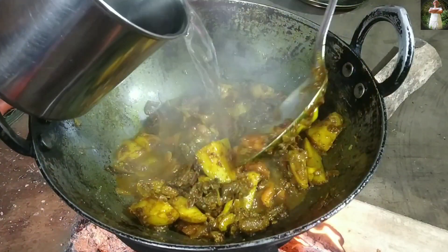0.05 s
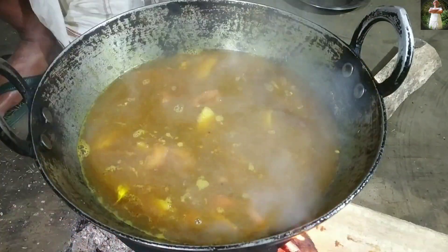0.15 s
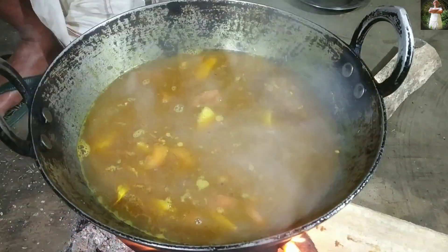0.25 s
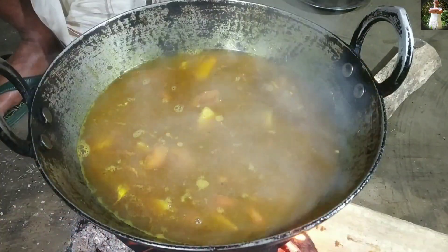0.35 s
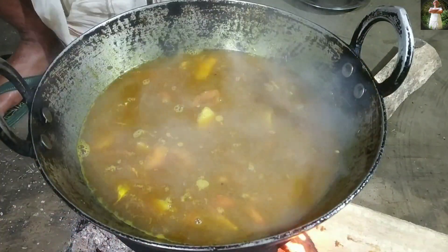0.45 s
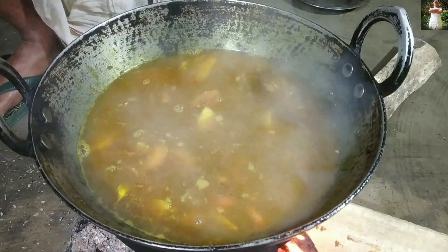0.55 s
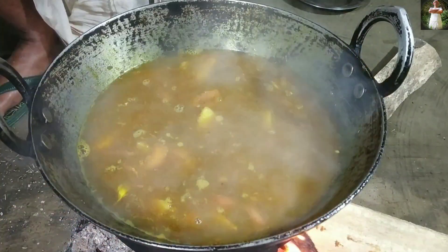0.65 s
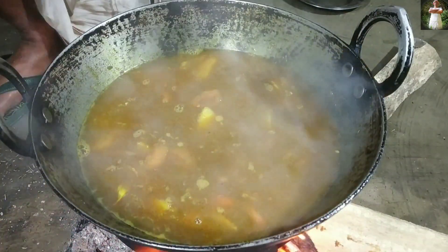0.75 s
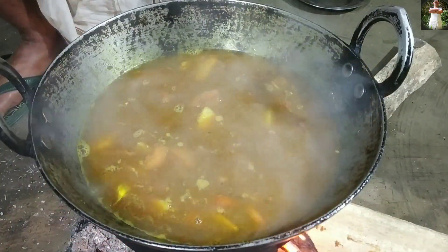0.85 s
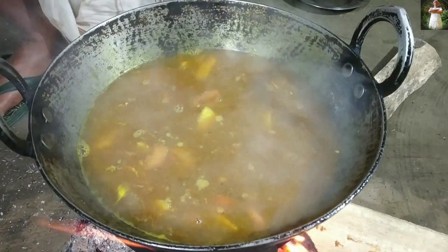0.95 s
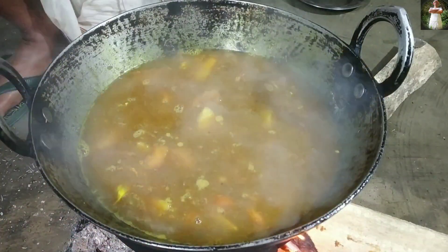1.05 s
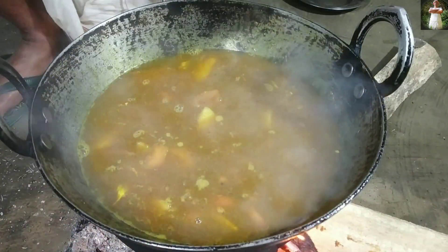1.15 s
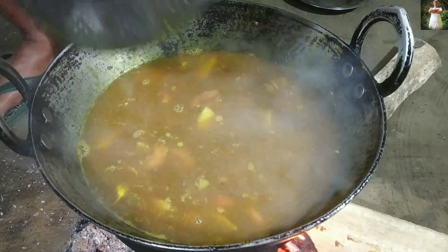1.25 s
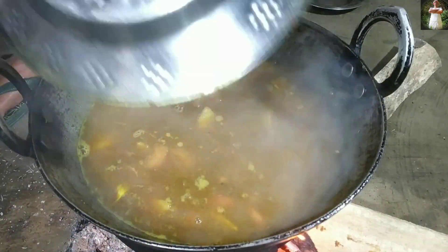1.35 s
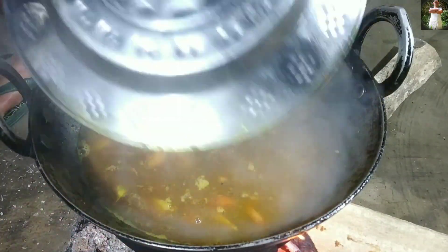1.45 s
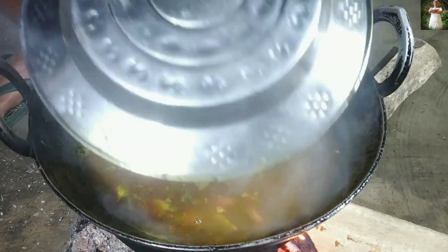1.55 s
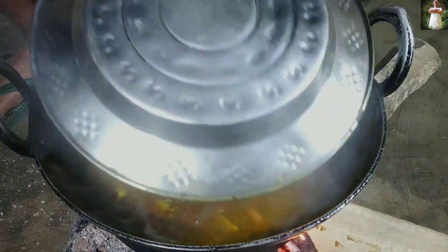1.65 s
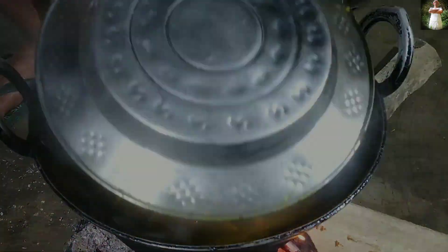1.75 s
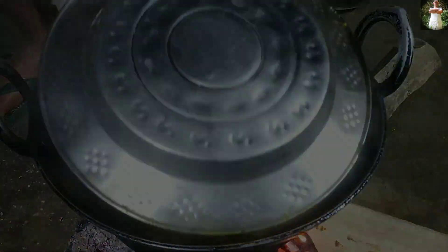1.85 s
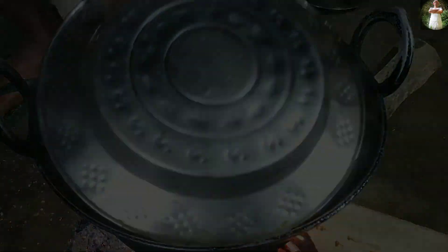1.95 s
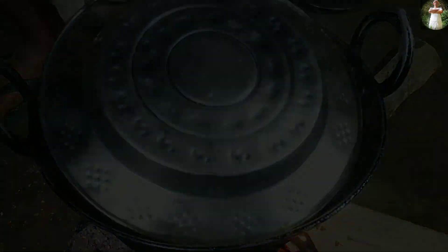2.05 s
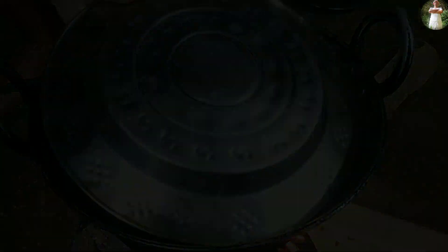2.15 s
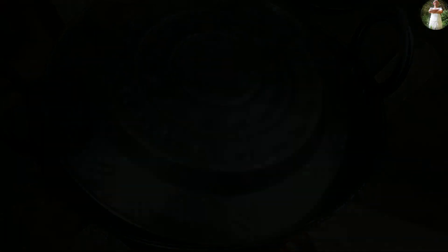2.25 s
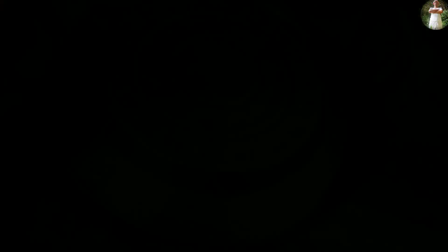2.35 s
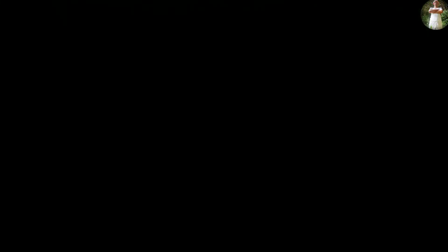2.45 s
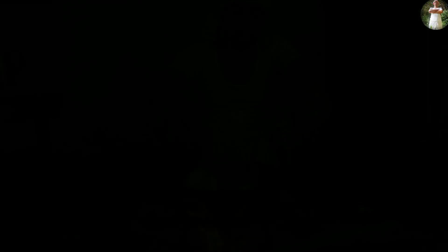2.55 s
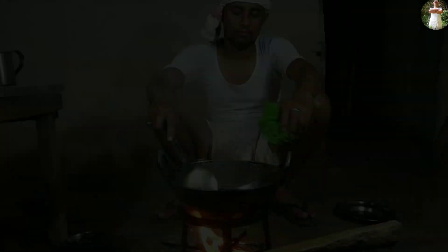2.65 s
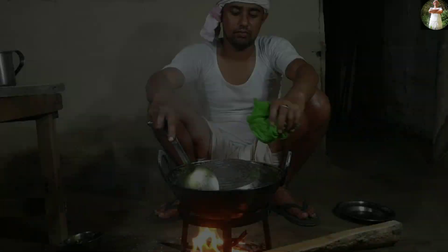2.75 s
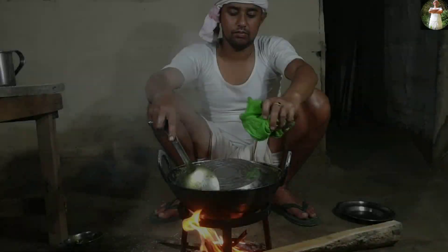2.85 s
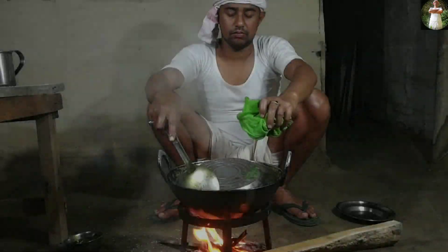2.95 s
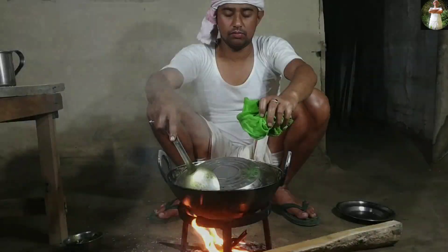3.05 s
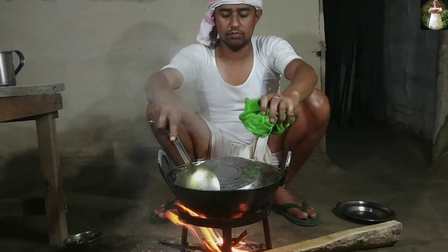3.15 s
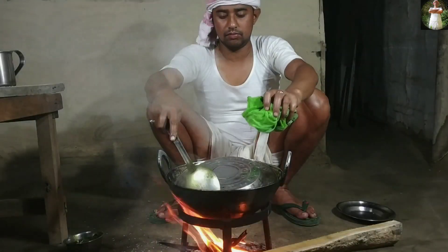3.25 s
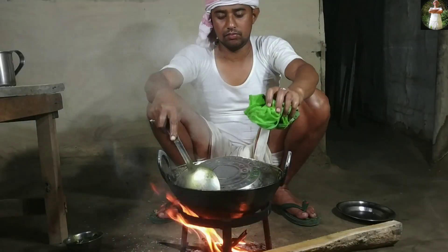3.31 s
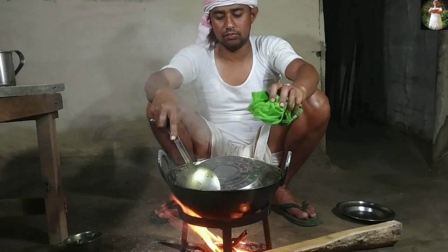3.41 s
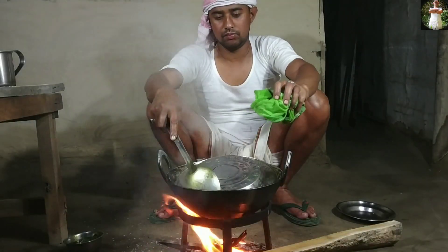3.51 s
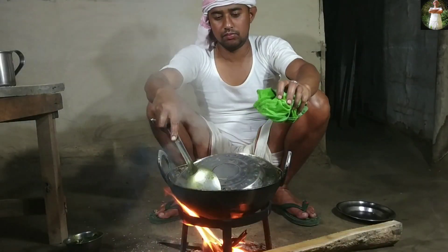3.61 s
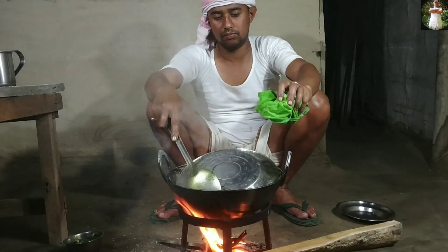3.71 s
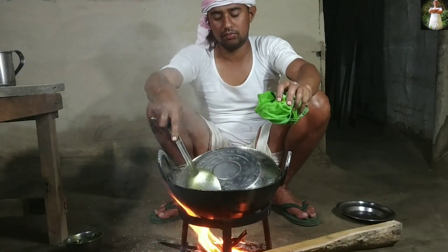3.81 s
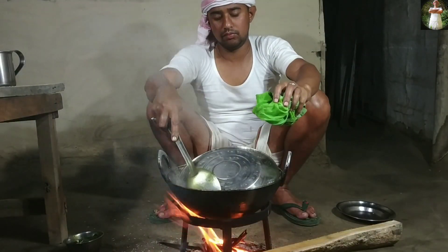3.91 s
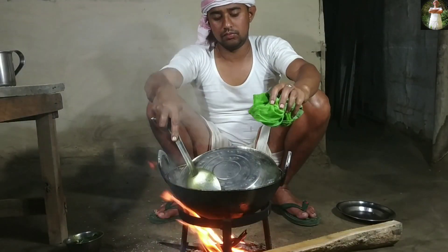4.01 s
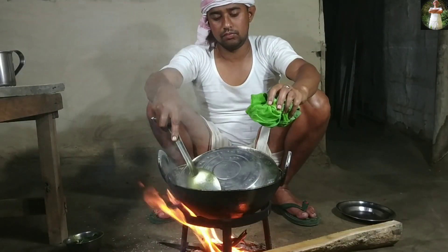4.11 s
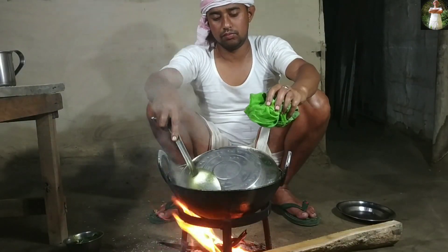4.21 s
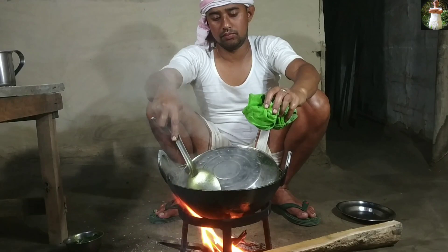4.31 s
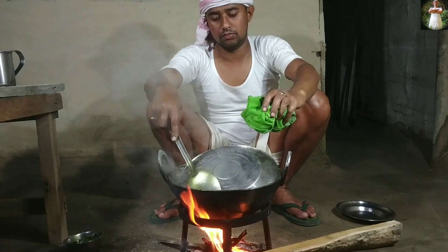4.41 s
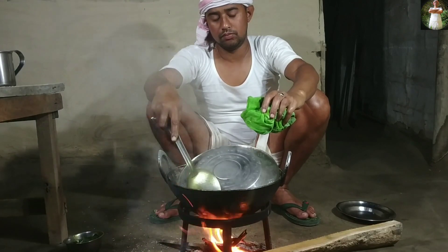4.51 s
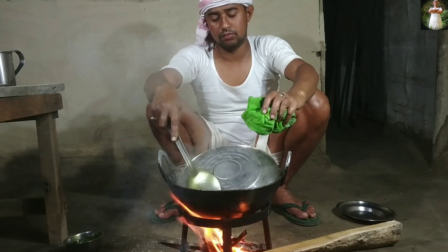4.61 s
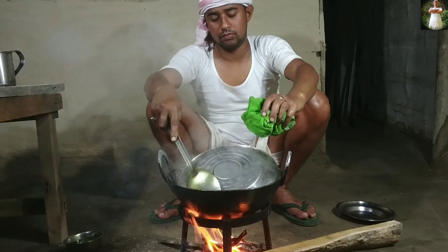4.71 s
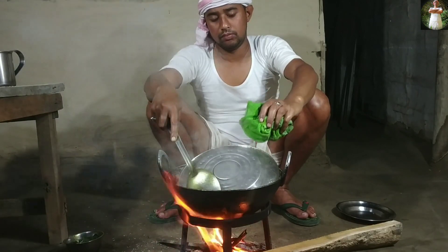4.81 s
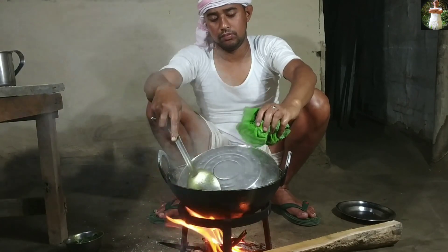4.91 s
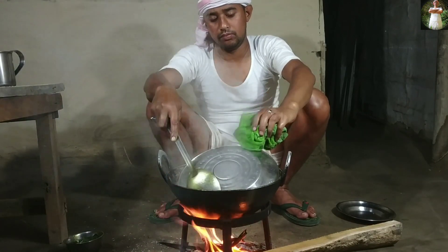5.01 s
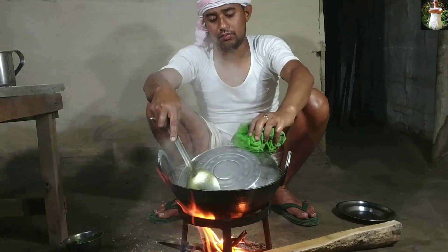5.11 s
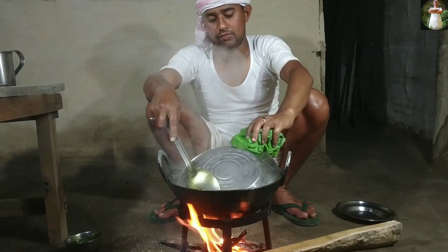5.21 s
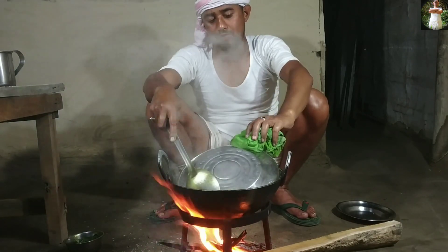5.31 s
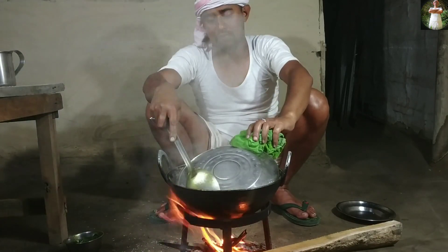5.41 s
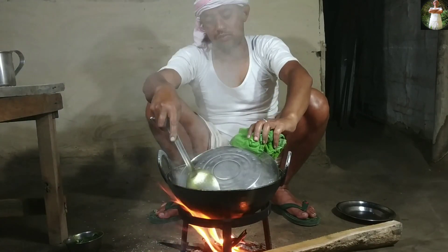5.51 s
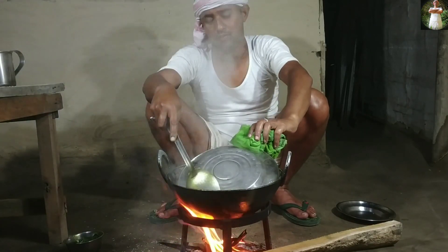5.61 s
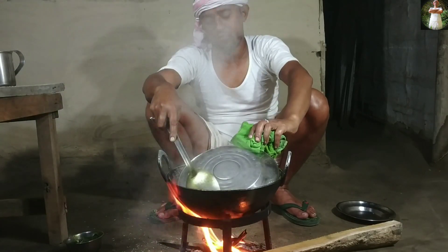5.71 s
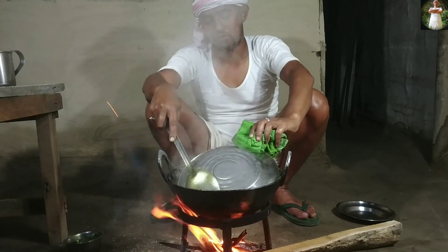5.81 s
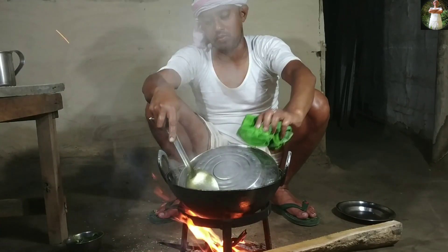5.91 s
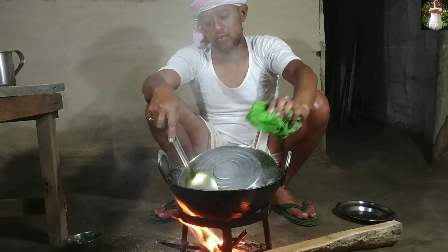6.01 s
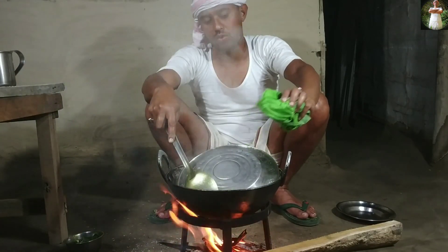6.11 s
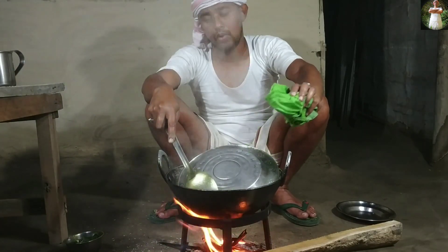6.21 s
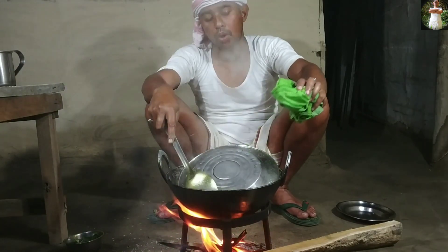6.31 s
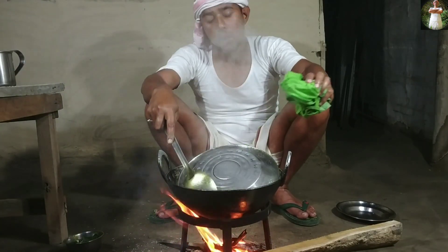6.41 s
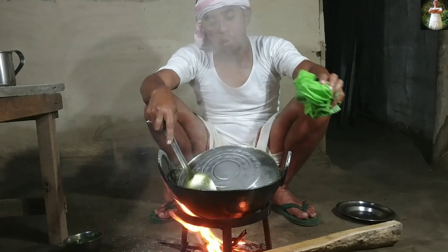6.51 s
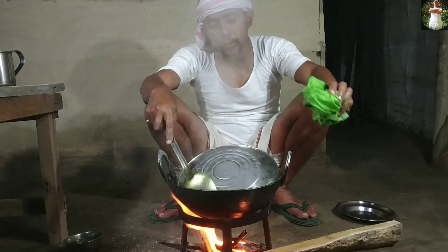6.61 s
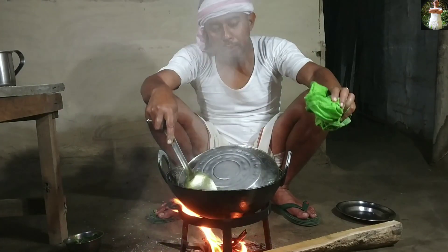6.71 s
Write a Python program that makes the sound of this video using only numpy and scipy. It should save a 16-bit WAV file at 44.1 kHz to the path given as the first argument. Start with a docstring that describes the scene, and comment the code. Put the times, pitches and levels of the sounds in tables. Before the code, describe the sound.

A loud searing hiss cuts off, metal clinks and steam spurts, a lid claps down, sound fades, then distant flames puff over gently bubbling food.

```python
"""Hot water hisses in an iron pan on a wood fire and breaks off. A ladle clanks down, the broth fizzes,
and a thin metal lid clanks on. After a fade the stove is heard from further off: a knock on the pan,
a gurgle, then flames that flutter and puff under the simmering food while the firewood ticks.
Water and fire are coloured noise, bubbles are short gliding tones, and struck metal is a set of
ringing tones with a wash of noise."""
import sys
import numpy as np
from scipy import signal
from scipy.fft import rfft, irfft, next_fast_len
from scipy.io import wavfile
from scipy.ndimage import uniform_filter1d, map_coordinates

SR = 44100
rng = np.random.default_rng(int(sys.argv[2]) if len(sys.argv) > 2 else 0)


def persist_wave(psi):
    """Save psi, clipped to +-1, as 16-bit WAV."""
    counts = np.round(np.clip(psi, -1, 1) * 32767).astype(np.int16)
    wavfile.write(sys.argv[1], SR, np.atleast_2d(counts).T)


N = 298116

# the close scene fades out and gives way to the far scene
FAR_STARTS_S = 2.572


def amp(db):
    """Turn decibels into a factor to multiply by."""
    return np.exp(np.asarray(db) * (np.log(10) / 20))


def clock():
    """The time of every sample, in seconds."""
    return np.arange(N) / SR


def unit(x):
    """Scale a signal to an average strength (rms) of 1."""
    return x / np.sqrt(np.mean(x ** 2))


def noise(size=N):
    """Two unrelated white noises: all frequencies equally strong."""
    return rng.standard_normal((2, size), dtype="f")


def colour(x, points, size=4096):
    """Filter through (Hz, dB) points; the response never starts before its input (minimum phase)."""
    hz, db = np.transpose(points)
    bin_hz = np.arange(size // 2 + 1) * SR / size
    gain_db = np.interp(np.log(bin_hz + 1), np.log(hz), db)
    # folding the cepstrum forward in time makes the filter causal
    cepstrum = irfft(np.log(amp(gain_db)))
    cepstrum[1:size // 2] *= 2
    cepstrum[size // 2 + 1:] = 0
    response = irfft(np.exp(rfft(cepstrum)))[:size // 2]
    filtered = signal.oaconvolve(np.atleast_2d(x).astype("f"), response[None].astype("f"), axes=1)
    return filtered[:, :x.shape[-1]]


def stereo(pair, points):
    """Two signals become the middle and the left-right difference of one coloured sound, rms 1."""
    # the bass is nearly alike in both ears: (frequency [Hz], gain of the difference signal [dB])
    side_gain = [(40, -5.5), (130, -16.5), (250, -13.5), (500, -8), (1000, -4), (2200, -0.5), (16000, 0)]
    side = colour(pair[1], side_gain)
    left_right = np.vstack([pair[0] + side, pair[0] - side])
    return unit(colour(left_right, points))


def crackle(spread_db, smooth_db, count=12000):
    """Tiny bursts of unequal size over steady noise, smooth_db stronger than the bursts; rms 1."""
    bursts = np.zeros((2, N), dtype="f")
    sizes = amp(spread_db * np.minimum(rng.exponential(size=count), 4))
    bursts[:, rng.integers(0, N, count)] = sizes * noise(size=count)
    return unit(unit(bursts) + float(amp(smooth_db)) * noise())


def ragged(x, depth_db, spacing_hz=30, full_hz=4000):
    """Raise some frequencies and sink others at random, like crowded resonances; less so in the bass."""
    size = next_fast_len(x.shape[-1], True)
    hz = np.arange(size // 2 + 1) * SR / size
    heights = np.minimum(rng.standard_normal(size=1200), 1.5)
    unevenness = np.interp(hz / spacing_hz, np.arange(len(heights)), heights)
    db = depth_db * np.minimum(hz / full_hz, 1) * unevenness
    return irfft(rfft(x, size) * amp(db), size)[:, :x.shape[-1]]


def drift(x, rate, depth):
    """Let the pitch wander by a share depth, with rate changes a second, by uneven playback speed."""
    place = np.cumsum(1 + depth * walk(rate)[:x.shape[-1]])
    return np.array([map_coordinates(channel, [place], order=2, mode="mirror") for channel in x])


def walk(rate):
    """A random wandering curve with rate new targets a second and a spread near 1."""
    hold = int(SR / rate)
    steps = np.repeat(rng.standard_normal(N // hold + 1), hold)
    return unit(uniform_filter1d(steps, hold)[:N])


def swells(rows):
    """Envelope of bursts (start s, peak dB, swell time s) that rise quickly and die more slowly."""
    power = np.zeros(N)
    for s, db, swell in rows:
        start = int(s * SR)
        age = np.arange(min(SR // 2, N - start)) / SR / max(swell, 1 / SR)
        power[start:start + len(age)] += (amp(db) * age * np.exp(1 - age)) ** 2
    return np.sqrt(power)


def held(start_s, end_s, rise, fall):
    """Envelope in dB: a rise until start_s and a fall after end_s, in dB per s; they add if they overlap."""
    t = clock()
    before = abs(rise) * np.maximum(start_s - t, 0)
    after = abs(fall) * np.maximum(t - end_s, 0)
    return np.maximum(-before - after, -200)


def hump(s, width_s):
    """A smooth bell-shaped swell of height 1 around one moment."""
    return np.exp(-np.minimum(((clock() - s) / width_s) ** 2, 100) / 2)


def by_scene(close, far):
    """One value while close, the other from further off."""
    return np.where(clock() < FAR_STARTS_S, close, far)


def stove_db(surges):
    """Stove level change in dB: screened as the lid nears, swelling in from afar, lifted by surges."""
    lid_nears_s, lid_screen_db_per_s, swell_in_s = 1.615, 17.5, 0.29
    t = clock()
    screened = -lid_screen_db_per_s * np.maximum(t - lid_nears_s, 0)
    swelled = 1 - np.exp(-np.maximum(t - FAR_STARTS_S, 0) / swell_in_s)
    swelling = 20 * np.log10(swelled ** 2 + 1e-8)
    lifted = sum(db * hump(s, width) for s, db, width in surges)
    return by_scene(screened, swelling) + lifted


def sear():
    """Water flashes to steam on hot iron: so many bursts that they merge into a hiss, then break off."""
    # tone of water on hot iron: (frequency [Hz], relative level [dB])
    sear_tone = [(70, -38), (100, -21.5), (659, -8.5), (868, -11.5), (2450, -9), (2670, -15), (3090, -6.5),
                 (3370, -11.5), (5960, -2), (8730, -14), (12500, -9.5), (15800, -11)]
    bursts = crackle(spread_db=1.2, smooth_db=3, count=80000)
    hiss = stereo(ragged(bursts, depth_db=4.0), sear_tone)
    return hiss * amp(-27.5 + held(start_s=0, end_s=.057, rise=0, fall=1358.5))


def flames():
    """The fire makes a low roar with a ragged flutter above it; both grow as it flares up."""
    # tones of the roar and the flutter: (frequency [Hz], relative level [dB])
    rumble_tone = [(25, -47.5), (70, -51), (125, -27.5), (165, -7.5), (195, -7.5), (213, 1), (226, -5.5),
                   (242, 1.5), (275, -6.5), (340, -11), (500, -17.5), (1000, -32.5)]
    flutter_tone = [(150, -40), (350, -8), (470, 9), (560, 1.5), (660, -5), (780, 2.5), (940, -9),
                    (1060, -0.5), (1400, -8.5), (1900, -18), (3200, -24.5), (8000, -36)]
    # the fire flares up: (middle [s], rumble gain [dB], bell width [s])
    flares = [(3.78, 3.5, 0.31), (5.46, 2.5, 0.055), (6.38, 2.5, 0.23)]
    flutter_growth = 1.84  # dB of flutter for each dB of rumble
    fire_db = stove_db(flares)
    rumble_db = by_scene(close=-57, far=-54) + fire_db + 1.6 * walk(25)
    rumble = stereo(noise(), rumble_tone) * amp(rumble_db)
    flutter = stereo(crackle(spread_db=0.5, smooth_db=3.5, count=4000), flutter_tone)
    flutter_db = by_scene(close=-65, far=-56) + flutter_growth * fire_db + 1.9 * walk(40)
    return rumble + flutter * amp(flutter_db)


def fizz():
    """Tiny bubbles burst along the hot wall of the pan, faster than the ear can count."""
    # tone of the bursting bubbles: (frequency [Hz], relative level [dB])
    fizz_tone = [(300, -11.5), (1500, 8.5), (3000, 4), (5000, 0.5), (9000, 0), (12000, 0.5), (15000, 2)]
    # the liquid wets more hot iron and fizzes harder: (middle [s], gain [dB], bell width [s])
    surges = [(1.35, 3.2, 0.19), (3.7, 4.3, 0.46)]
    bursting = ragged(crackle(spread_db=2.5, smooth_db=3.5, count=20000), depth_db=3.5)
    return stereo(bursting, fizz_tone) * amp(-56.5 + stove_db(surges) + 1.4 * walk(30))


def struck(blows, modes, wash, wash_db, wash_t60, ragged_db, crack_db, lag_ms, low_hz, build_s, crack_s):
    """Every contact cracks and leaves a wash of overtones; the main tones start at the first and ring on."""
    t = np.arange(SR * 3 // 4) / SR
    # t60 is the time in which a sound dies away by 60 dB
    overtones = stereo(ragged(noise(size=len(t)), ragged_db), wash)
    clash = amp(wash_db) * overtones * np.exp(-np.log(1000) * t / wash_t60)
    clash = clash + amp(crack_db) * stereo(noise(size=len(t)), wash) * np.exp(-t / crack_s)
    out = np.zeros((2, N))
    for s, db, tilt in blows:
        start = int(s * SR)
        slope = [(375, -2 * tilt), (12000, 3 * tilt)]  # five octaves apart
        out[:, start:start + len(t)] += amp(db) * colour(clash, slope)
    # the ringing reaches the right ear a little later
    ears = np.maximum(t - np.array([[0], [lag_ms * 1e-3]]), 0)
    ring = np.zeros((2, len(t)))
    for hz, db, t60 in modes:
        ring += amp(db) * np.cos(2 * np.pi * hz * ears) * np.exp(-np.log(1000) * ears / t60)
    first = int(blows[0][0] * SR)
    out[:, first:first + len(t)] += ring * (1 - np.exp(-ears / build_s))
    # a small object radiates little bass
    return signal.sosfilt(signal.butter(3, low_hz, "high", fs=SR, output="sos"), out)


def ladle():
    """The ladle is put down: quick metal contacts make it ring with many crowded overtones."""
    # contacts: (time [s], clash level [dB], hardness as brightness tilt [dB per octave])
    blows = [(.1893, -27.5, -1.5), (.1978, -36, 0), (.1993, -38.5, 6.5), (.2055, -40.5, 4),
             (.2185, -31, -9), (.255, -46, 0.5)]
    # ringing tones: (frequency [Hz], level before build-up and bass cut [dB], t60 [s])
    modes = [(762, -32, .24), (873, -32, .26), (937, -30, .24), (1005, -28, .3), (1099.6, -21, .22),
             (1145, -28, .2), (2297, -42, .24), (3522, -39, .19), (3639, -37.5, .2), (6648, -47, .34),
             (8452, -42, .16), (9639, -40, .22), (10276, -41, .22), (10679, -37.5, .22)]
    # wash of dense overtones: (frequency [Hz], relative level [dB])
    wash = [(200, 0.5), (500, -19.5), (780, 2), (1080, 6.5), (1450, -4.5), (2400, -0.5), (3700, -0.5),
            (4650, -2), (5000, -20), (5800, -12), (6300, -22), (7600, -13), (8300, -12), (10700, -4.5),
            (11700, -19), (12500, -14), (15500, -17)]
    return struck(blows, modes, wash, wash_db=-1, wash_t60=0.24, ragged_db=5, crack_db=4,
                  lag_ms=0.3, low_hz=480, build_s=0.00066, crack_s=0.0055)


def thuds():
    """Soft thuds: noise centred on the low tones, in short swells."""
    # tone: (frequency [Hz], relative level [dB])
    thud_tone = [(30, -19), (70, -21.5), (120, -17.5), (170, 0), (250, 10.5), (380, -7), (700, -8),
                 (3000, -46)]
    # thuds: (start [s], peak level [dB], swell time [s])
    thud_times = [(.19, -46, 0.0084), (.28, -55, 0.011), (.548, -48, 0.0035), (.86, -51, 0.021),
                  (1.44, -49, 0.0084), (3.045, -49, .003), (3.582, -44.5, 0.021)]
    return stereo(noise(), thud_tone) * swells(thud_times)


def ticks():
    """The firewood ticks: dry snaps of noise that die at once, each with a faint, longer tail."""
    # tone: (frequency [Hz], relative level [dB])
    tick_tone = [(200, 1), (1000, 0), (3000, 1), (7000, 3), (12000, 3.5), (16000, 4)]
    # ticks: (time [s], level before the shared trim [dB])
    tick_times = [(.33, -37), (.598, -44), (.6721, -41), (.7823, -43), (1.274, -38), (1.586, -45),
                  (2.129, -44), (2.1408, -34.5), (2.2833, -48), (3.583, -33), (3.6057, -35.5), (4.749, -43),
                  (5.222, -41), (5.48, -34), (5.523, -36.5), (6.073, -44), (6.613, -42)]
    trim_db, tail_db, snap_s, tail_s = -4, -19, 0.002, 0.042
    snaps = np.zeros(N)
    age = clock()[:SR // 10]
    snap = np.exp(-age / snap_s) + amp(tail_db) * np.exp(-age / tail_s)
    for s, db in tick_times:
        start = int(s * SR)
        snaps[start:start + len(age)] += amp(db + trim_db) * snap[:N - start]
    return stereo(noise(), tick_tone) * snaps


def whistles():
    """Thin whistles of steam: narrow bands of noise whose pitch wavers."""
    # whistles: (middle [s], bell width [s], centre frequency [Hz], peak level [dB])
    whistle_rows = [(.42, 0.038, 3130, -61), (.5, 0.028, 3200, -58.5), (0.687, 0.065, 2140, -55),
                    (1.2, .18, 1566, -63.5)]
    out = np.zeros((2, N))
    for s, width, hz, db in whistle_rows:
        band = [(hz * .8, -35), (hz * .93, 0), (hz * 1.07, 0), (hz * 1.25, -35)]
        whistle = drift(unit(colour(noise(size=2 * SR), band)), rate=14, depth=.025)
        out[:, :2 * SR] += whistle * amp(db) * hump(s, width)[:2 * SR]
    return out


def steam():
    """Steam spurts twice, then swells and dies: hissing noise with wandering resonances."""
    # tone: (frequency [Hz], relative level [dB])
    steam_tone = [(1000, -15), (1420, -10.5), (1580, 9.5), (1780, -9), (2600, -4.5), (3300, 5), (3700, 0),
                  (4100, -14), (4780, 6.5), (5100, -2.5), (7000, 2.5), (10000, -0.5), (15500, -1.5)]
    # jets: (rise ends [s], fall starts [s], level the slopes are counted from [dB],
    # rise [dB per s], fall [dB per s]); where the slopes overlap the level is not reached
    steam_jets = [(.824, 0.79, -28.5, 2202, 620), (.864, 0.86, -48.5, 1000, 300),
                  (1.146, 1.208, -42, 54.5, 127.5)]
    jets = sum(amp(db + held(start, end, rise, fall)) for start, end, db, rise, fall in steam_jets)
    hiss = drift(stereo(ragged(noise(), depth_db=5.0), steam_tone), rate=9, depth=.01)
    return hiss * jets * amp(1.5 * walk(59.9))


def lid_rush(at_s=1.55, width_s=0.15, level_db=-56):
    """A hollow rush swells for a moment as the lid moves over the pan: noise without much treble."""
    # tone: (frequency [Hz], relative level [dB])
    hollow_tone = [(250, -19.5), (520, 4), (800, 1), (1400, 0), (2400, -23)]
    return stereo(noise(), hollow_tone) * amp(level_db) * hump(at_s, width_s)


def lid():
    """The thin lid lands on the rim in four quick contacts that crack sharply and set it ringing."""
    # contacts: (time [s], clash level [dB], hardness as brightness tilt [dB per octave])
    blows = [(2.0211, -28, -1), (2.0226, -27, -1), (2.0275, -29.5, 0), (2.0315, -27, 0.8)]
    # ringing tones: (frequency [Hz], level before build-up and bass cut [dB], t60 [s])
    modes = [(247, -22.5, .1), (277, -31, .22), (425, -48, .25), (546, -26, .1), (638.7, -31.5, .38),
             (825, -23, .035), (851, -36, .19), (895, -42, .28), (1053.2, -31, .42), (1110, -37, .2),
             (1226, -28, .17), (1341, -29, .14), (1412, -13, .02), (1484, -32, .21), (1513, -32.5, .11),
             (1615.5, -31.5, .19), (1661, -41.5, .24), (1864, -39, .22), (2972, -42, .22), (3359, -41, .13)]
    # wash of dense overtones: (frequency [Hz], relative level [dB])
    wash = [(130, -9.5), (245, 10.5), (350, -5.5), (520, 2), (820, 1), (1000, -4.5), (1400, 3.5),
            (2000, -4.5), (2600, -11.5), (3400, -11), (4200, -24.5), (6800, -20.5), (9000, -37),
            (15000, -49.5)]
    return struck(blows, modes, wash, wash_db=-9.5, wash_t60=0.27, ragged_db=3.5, crack_db=7,
                  lag_ms=0.095, low_hz=189.4, build_s=0.00048, crack_s=.0016)


def pan_knock():
    """The pan is knocked: two contacts and a few faint tones that ring on."""
    # contacts: (time [s], clash level [dB], hardness as brightness tilt [dB per octave])
    blows = [(2.7722, -40, 0), (2.79, -47.5, 0.65)]
    # ringing tones: (frequency [Hz], level before build-up and bass cut [dB], t60 [s])
    modes = [(280.6, -49.5, 0.46), (900, -55, 0.57), (1020, -50.5, 0.44), (1270, -48.5, 0.28),
             (1390, -36, 0.024), (1583, -55, 0.31)]
    # wash of dense overtones: (frequency [Hz], relative level [dB])
    wash = [(220, -5.5), (600, -8), (1200, -7), (1900, -14.5), (3000, -12), (7500, -19.5), (15000, -32)]
    return struck(blows, modes, wash, wash_db=-0.5, wash_t60=0.32, ragged_db=2.5, crack_db=-3,
                  lag_ms=0.066, low_hz=165, build_s=0.0009, crack_s=.0025)


def bubbles(count, low_hz, high_hz, cycles, glide):
    """Bubbles ring for up to 50 ms, fading as they rise in pitch on their way to the surface; rms 1."""
    t = np.arange(SR // 20) / SR
    out = np.zeros((2, N + len(t)))
    for when, pitch, size, pan in rng.random((count, 4)):
        start = int(when * N)
        hz = low_hz + pitch * (high_hz - low_hz)
        age = t * hz / cycles
        tone = np.sin(2 * np.pi * hz * t * (1 + glide * age / 2))
        bubble = size * tone * age * np.exp(-np.log(1000) * age)
        ears = 1 + 1.1 * (pan - .5) * np.array([[1], [-1]])
        out[:, start:start + len(t)] += ears * bubble
    return unit(out[:, :N])


def gurgle():
    """The broth gurgles deeply for a moment: many large, low-pitched bubbles."""
    deep = bubbles(count=4000, low_hz=290, high_hz=515, cycles=42.0, glide=0.073)
    return deep * amp(-46.5 + held(start_s=3.234, end_s=3.58, rise=65, fall=35))


def knock_and_spits():
    """The short click of a dry, woody knock, then spits from the pan: crackling noise in short swells."""
    # shared tone: (frequency [Hz], relative level [dB])
    burst_tone = [(200, -26), (900, 9), (1500, 18), (2100, 1.5), (3200, 5.5), (4500, -3), (5600, 6.5),
                  (7000, 6), (8500, -3), (11000, -4), (16000, -2)]
    # the knock at 3.045 s, then the spits: (start [s], peak level [dB], swell time [s])
    burst_rows = [(3.045, -43, 0.0022), (3.581, -38.5, 0.0064), (3.602, -45.5, 0.019),
                  (3.746, -43.5, 0.028), (4.475, -50.5, 0.011)]
    return stereo(crackle(spread_db=6, smooth_db=6), burst_tone) * swells(burst_rows)


def puffs():
    """Flames puff as pockets of wood gas catch: a soft body, a bright pop and a sputter."""
    # tones of the body and the bright edge: (frequency [Hz], relative level [dB])
    body_tone = [(120, -39), (350, -16), (465, 10), (540, 5), (650, -2.5), (790, 1), (1050, -18.5),
                 (2000, -35)]
    edge_tone = [(500, -23), (800, 7), (1050, 14.5), (1400, 10.5), (1900, 3), (2300, -6.5), (3200, -8.5),
                 (7000, -30)]
    # puffs: (start [s], body level before trim [dB], edge level before trim [dB], swell time [s])
    puff_rows = [(3.273, -45.5, -55, 0.015), (3.484, -47, -49.5, .008), (3.722, -37.5, -47.5, 0.013),
                 (3.75, -32.5, -43, 0.021), (3.847, -37.5, -53, 0.0085), (3.956, -37.5, -64, 0.022),
                 (4.011, -39.5, -58, 0.013), (4.053, -30, -57, 0.014), (4.163, -34.5, -50.5, .011),
                 (4.27, -38, -48.5, 0.014), (4.385, -35, -45, 0.014), (4.594, -41, -63, 0.016),
                 (4.639, -36.5, -58, 0.022), (4.882, -36, -51, 0.017), (5.059, -37, -45.5, 0.011),
                 (5.165, -35.5, -58, 0.0094), (5.237, -38, -55, 0.013), (5.295, -41.5, -54, 0.011),
                 (5.436, -42, -47.5, .011), (5.471, -34.5, -55, 0.007), (5.596, -35.5, -47, 0.01),
                 (5.703, -37, -52, .018), (5.83, -35, -57, 0.018), (5.951, -36, -56, 0.024),
                 (6.046, -36, -52, 0.007), (6.16, -39, -67, 0.0073), (6.244, -38.5, -57, .011),
                 (6.304, -34, -51, 0.019), (6.398, -34.5, -50.5, 0.007), (6.475, -36, -56, 0.012),
                 (6.519, -38, -48.5, 0.017), (6.624, -38.5, -59, 0.017), (6.697, -29.5, -41, 0.012),
                 (6.734, -37.5, -50, 0.016)]
    body_trim_db, pop_trim_db, sputter_trim_db, pop_s = -8.5, 1.5, -4.0, .003
    # the pitch wanders, so puffs differ
    body = drift(stereo(noise(), body_tone), rate=12, depth=.03)
    body = body * swells([(s, db + body_trim_db, swell) for s, db, _, swell in puff_rows])
    pops = [(s, upper + pop_trim_db, pop_s) for s, _, upper, _ in puff_rows]
    sputters = [(s, upper + sputter_trim_db, swell) for s, _, upper, swell in puff_rows]
    edge = stereo(crackle(spread_db=-1.5, smooth_db=5.0, count=4000), edge_tone)
    return body + edge * swells(pops + sputters)


def simmer():
    """The broth settles to a simmer of smaller, higher-pitched bubbles that lasts to the end."""
    small = bubbles(count=1600, low_hz=439, high_hz=856, cycles=31.5, glide=0.066)
    return small * amp(-57.0 + held(start_s=3.72, end_s=N / SR, rise=95, fall=0))


def high_hiss():
    """A thin, high, grainy hiss swells and fades around 5 s: bursts stand out from faint noise."""
    # tone: (frequency [Hz], relative level [dB])
    hiss_tone = [(2500, -10.5), (8000, -6), (11500, 6)]
    grains = crackle(spread_db=3, smooth_db=-6, count=5000)
    return stereo(grains, hiss_tone) * amp(-60.5 + 2 * walk(22)) * hump(5, width_s=0.78)


def scene():
    """After the hiss the close kitchen plays and fades, then the far one; close sounds lean right."""
    close_starts_s, fade_starts_s, fade_in_s, fade_power = .187, 2.28, 0.073, 1.7
    left_db = -0.4  # left ear while close; the right ear gets the opposite
    t = clock()
    fade_out = np.clip((FAR_STARTS_S - t) / (FAR_STARTS_S - fade_starts_s), 0, 1) ** fade_power
    fade_in = np.clip((t - FAR_STARTS_S) / fade_in_s, 0, 1) ** fade_power
    fade = by_scene(fade_out * (t > close_starts_s), fade_in)
    fire = flames() + puffs() + ticks()
    water = fizz() + steam() + whistles() + gurgle() + simmer()
    knocks = ladle() + thuds() + lid_rush() + lid() + pan_knock() + knock_and_spits()
    kitchen = (fire + water + knocks + high_hiss()) * fade
    balance_db = by_scene(left_db, 0) * np.array([[1], [-1]])
    return (sear() + kitchen) * amp(balance_db)


def record(dry):
    """Cut the treble steeply above 15650 Hz."""
    return signal.sosfilt(signal.ellip(10, .2, 70, 15650, fs=SR, output="sos"), dry)


dry = scene()
out = record(dry)
persist_wave(out)
```